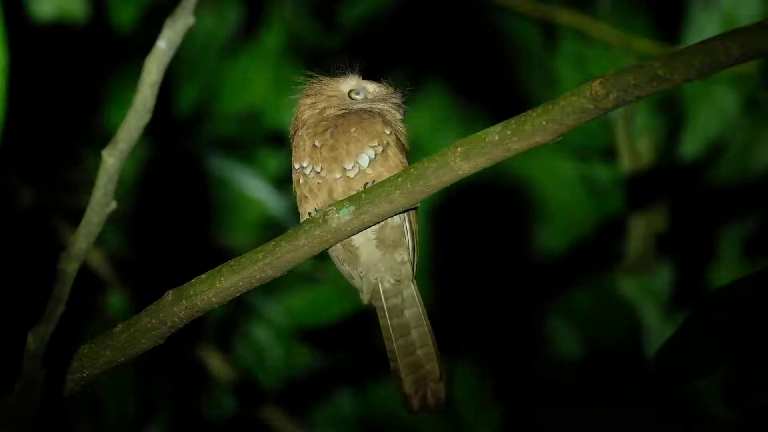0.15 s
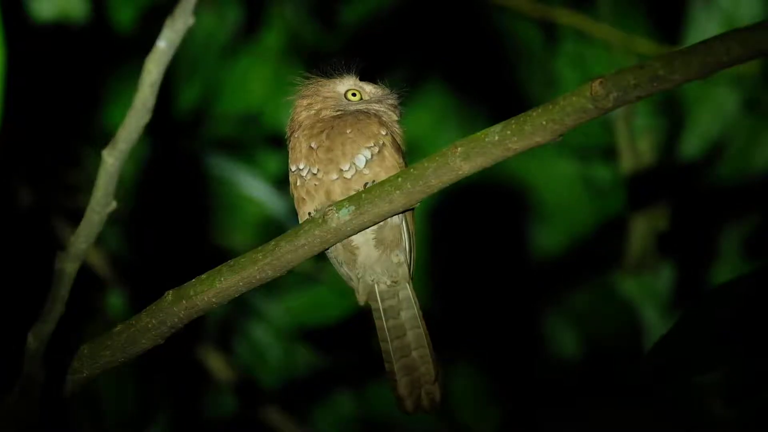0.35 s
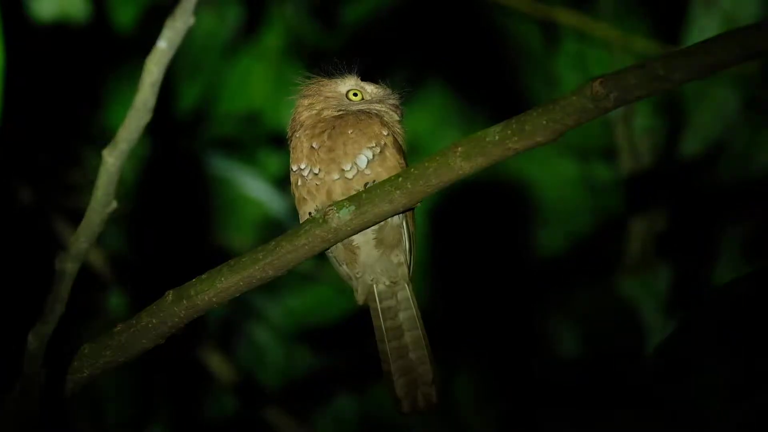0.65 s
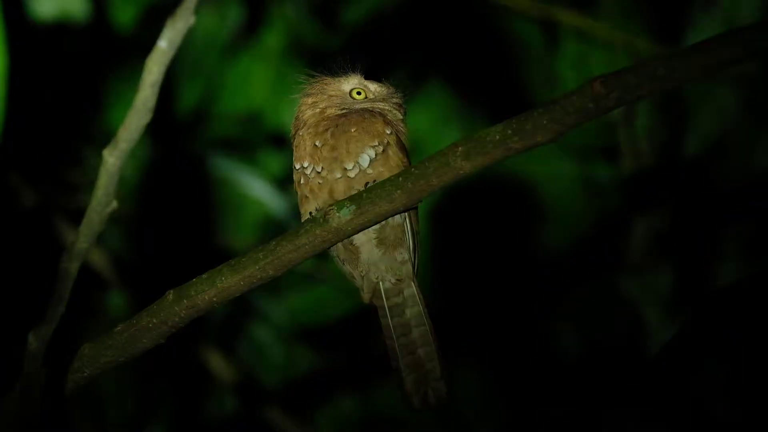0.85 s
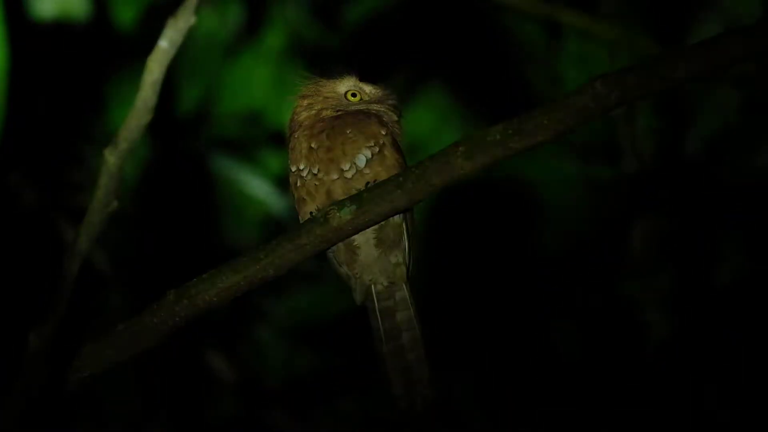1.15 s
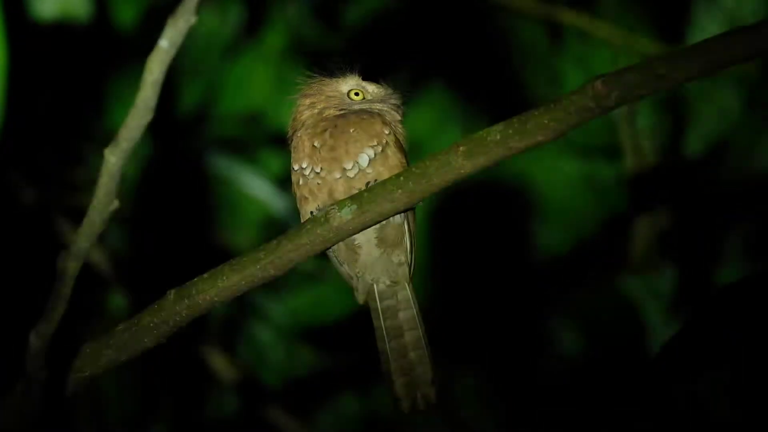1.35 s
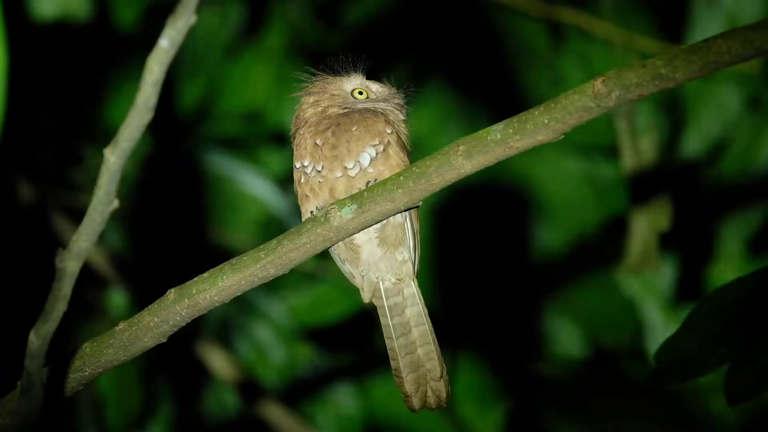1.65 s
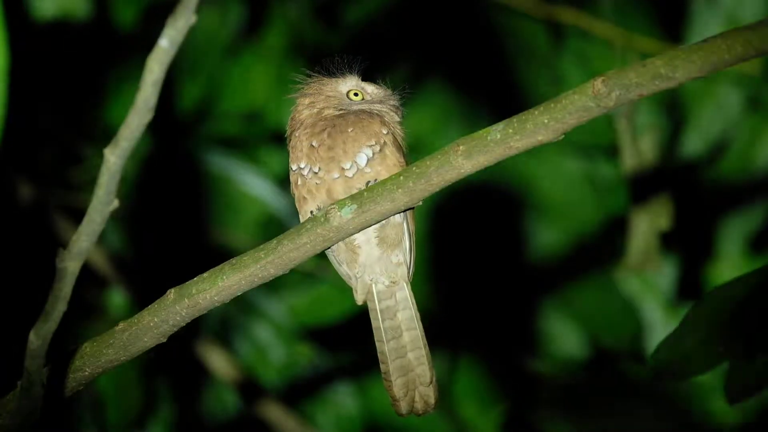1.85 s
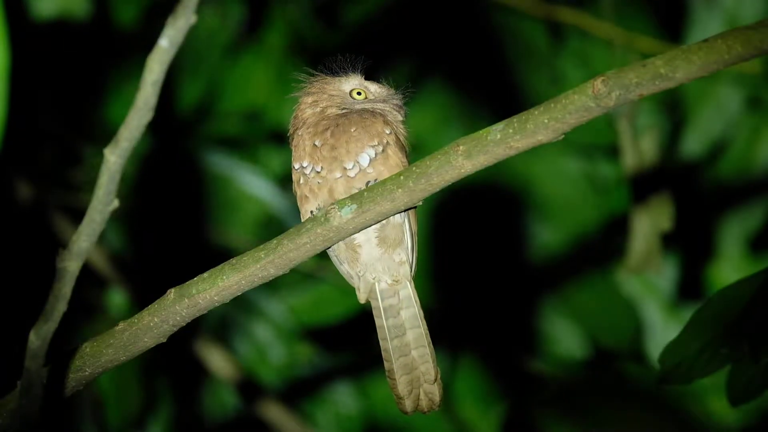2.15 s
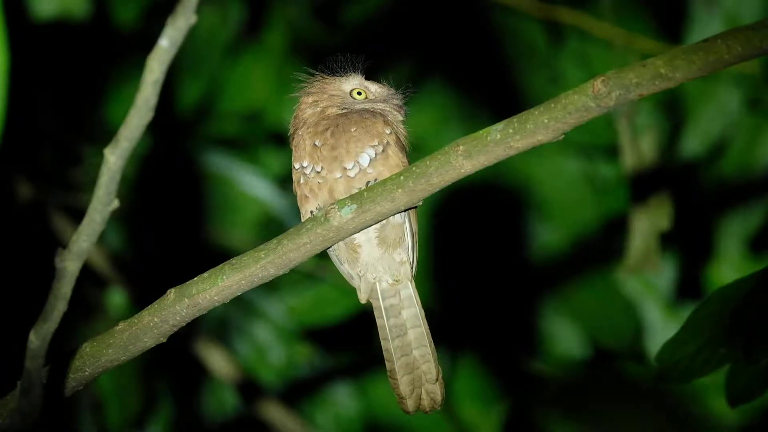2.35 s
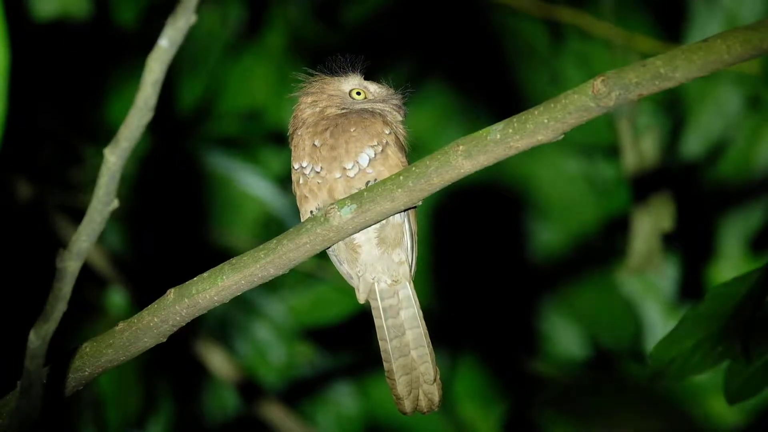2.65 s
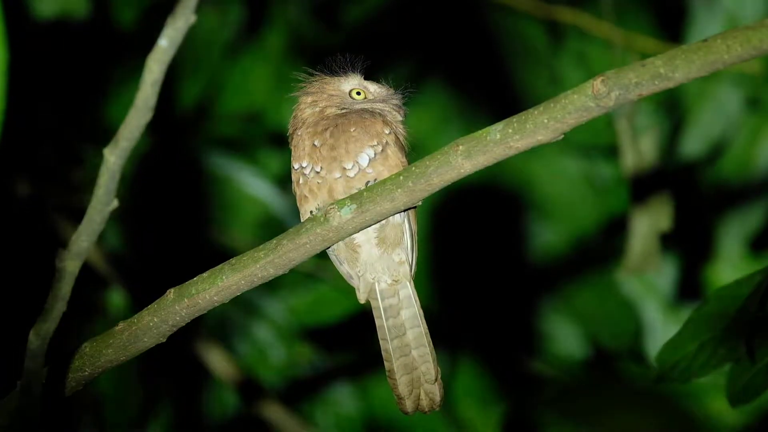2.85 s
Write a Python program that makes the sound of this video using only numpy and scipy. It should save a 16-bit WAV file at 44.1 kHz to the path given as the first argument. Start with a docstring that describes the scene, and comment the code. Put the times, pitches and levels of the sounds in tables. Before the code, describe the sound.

Night crickets singing close by, with pulsing bush-crickets, faint low rumble and early handling clicks.

```python
"""A forest at night: three kinds of cricket sing near by, over pulsing bush-crickets and a far chorus.
Each cricket song is a row of wing strokes, gliding tones scattered by trunks and leaves.
The bush-crickets add surging noise, and countless far insects merge into a hiss. A low distant rumble
of noise and tones swells and sinks underneath. The camera body clicks a few times under the hand at
the start, as short ringing modes."""
import sys
import numpy as np
from scipy import signal
from scipy.fft import rfft, irfft
from scipy.io import wavfile

SR = 44100
rng = np.random.default_rng(int(sys.argv[2]) if len(sys.argv) > 2 else 0)


def digitize_waveform(pressure):
    """Quantize a signal to 16-bit integers and store it at the path in sys.argv[1].

    Rows of a 2-D input are taken as channels; values are limited to [-1, 1].
    """
    field = np.atleast_2d(pressure).T
    bounded = np.clip(field, -1, 1)
    quanta = np.round(bounded * 32767).astype(np.int16)
    wavfile.write(sys.argv[1], SR, quanta)


N = 132741
T = np.arange(N) / SR  # time, s

# Tabled levels are relative within a song or spectrum unless noted; positive side_db is louder at left.

# low cricket's chirps: start_s, stroke_1_db, stroke_2_db, stroke_3_db, pitch_hz (of the first stroke)
CHIRPS = [(0.281, -1, 0.7, 2, 2988), (0.959, -2.5, 0, -6, 2979), (1.58, -6.5, 1, -4, 2992),
          (2.170, -8.5, 1, 0.5, 2988), (2.800, -3, 0, -14, 2992)]
CHIRP_GAP_S, CHIRP_STROKE_S, CHIRP_FALL_HZ, CHIRP_DB = 0.055, 0.066, 25.2, -46
CLOSE_S, CLOSE_DB, CLOSE_HZ = 0.19, -14, 2883  # a soft sagging note closes each chirp

# trilling cricket's two bouts: time_s, level_db, pitch_hz
TRILL_PATH = [(0.07, -13, 3720), (0.18, -3.5, 3730), (0.45, -1, 3794), (0.8, 1, 3810), (1.11, 0, 3813),
              (1.19, -18, 3830), (1.3, -58, 3780), (2.6, -51, 3540), (2.72, -13, 3550), (2.82, -7, 3660),
              (3.01, -3.5, 3765)]
TRILL_RATE_HZ, TRILL_DB, TRILL_FALL_HZ, TRILL_DROOP_HZ = 43.03, -47.5, 23, 270
RETURN_S, RETURN_DB, RETURN_FLAT_HZ = 0.0116, -3.5, 6  # the wing's softer return stroke

# high cricket's swelling phrases: loud_start_s, loud_length_s, level_db
PHRASES = [(0.102, .32, -2.5), (0.885, 0.26, 0), (1.808, .32, -2.5), (2.746, 0.29, 0.5)]
HIGH_HZ, HIGH_RATE_HZ, HIGH_DB = 6764, 27, -56
HIGH_SWELL_DB_PER_S, HIGH_FADE_DB_PER_S, HIGH_HZ_PER_DB = 194, 222.5, 4.5
HIGH_LEAD_S, HIGH_LEAD_DB = 0.14, -11.5  # each phrase starts softly, this long before its loud part

# handling clicks: start_s, peak_level_db, treble_corner_hz, side_db
CLICKS = [(0.0962, -23, 2300, -9), (0.1588, -27.5, 3320, -8), (0.2675, -27.5, 4630, -10),
          (0.4871, -26, 1210, -4.5), (0.694, -36.5, 2170, 4.5)]
# resonant modes of the camera body: pitch_hz, level_db, t60_s
BODY_MODES = [(680, -5.5, 0.051), (988, 0, .035), (1270, -2, 0.024), (1400, 2.5, 0.024), (1840, -7, 0.026),
              (2600, -1.5, 0.015), (3340, 0.5, 0.012)]

# surging bush-crickets' strokes: pitch_hz, rate_hz, fall_hz, level_db (before the surge)
SURGERS = [(4958, 48.6, 600, -61), (5384, 22, 140, -60.5)]
SURGE_S, SURGE_CREST_S, SURGE_DB = 0.2205, 0.25, 4.5
# spectrum of the bush-crickets' rasp: frequency_hz, level_db
RASP_SPECTRUM = [(4100, -39), (4500, -7.5), (4750, -4), (5050, -1.5), (5350, 1.5), (5600, -11.5),
                 (5900, -5), (6500, -65)]
# spectrum of their higher buzz: frequency_hz, level_db
BUZZ_SPECTRUM = [(5300, -19), (5700, -7.5), (5950, -7.5), (6150, 2.5), (6300, -31), (6480, -20),
                 (7000, -43)]

# far crickets that trill without pause: pitch_hz, rate_hz, fall_hz, level_db (rms), side_db
FAR_CRICKETS = [(3810, 46, 210, -58.5, 4), (3603, 51, 445, -62, 1), (2852, 52, 360, -63.5, 4),
                (6070, 64, 240, -58, 5), (6810, 27, 120, -70.5, 4)]

# spectrum of the far chorus hiss: frequency_hz, density_db_per_hz
HISS_SPECTRUM = [(2000, -13.5), (2700, -0.5), (3200, 0), (3900, -23), (4200, -22), (4800, -3), (6100, 2.5),
                 (6600, -3.5), (7300, -12), (7750, -4.5), (8200, -9), (8900, -1.5), (9900, -10),
                 (10800, -1), (11500, -11.5), (12200, -18), (12700, -25), (15000, -33)]
HISS_DB = -56

# spectrum of the distant rumble: frequency_hz, density_db_per_hz
RUMBLE_SPECTRUM = [(12, -65), (20, -29), (82, -4), (125, -6), (173, -5), (240, -4.5), (320, -6), (480, -9),
                   (564, -12.5), (612, -12.5), (1040, -22.5), (1270, -17), (1470, -27), (1590, -24),
                   (1950, -29.5), (2600, -34.5), (3380, -63), (5720, -120)]
# swelling of the rumble noise: time_s, level_db
RUMBLE_LEVEL = [(0.1, -42.2), (0.35, -42.6), (0.7, -41.4), (1.2, -41.2), (1.8, -41.8), (2.35, -41.6),
                (2.6, -39.8), (3.0, -39.2)]
# left-right likeness of the rumble noise: frequency_hz, correlation (no unit)
RUMBLE_LIKENESS = [(30, 0.94), (125, 0.87), (300, 0.81), (500, 0.6), (1000, 0.23), (2500, .2)]
# wavering tones in the rumble: pitch_hz, level_db (peak, before wavering)
DRONE = [(122, -49), (299, -53), (479, -63.5), (539, -71.5)]
# a hollow band in the rumble that swells and sinks: time_s, level_db, center_hz
HOLLOW = [(0.1, -59, 379.6), (0.6, -57.5, 420), (1.05, -45.5, 410), (1.5, -46.5, 360), (1.82, -45, 289.7),
          (2.2, -53.5, 290), (2.55, -44.5, 304.3), (3.0, -44, 295.5)]
HOLLOW_SPREAD_HZ = 83  # to either side of the center

START_S, START_DB, SETTLE_S = 0.074, -5.5, 0.055  # the recorder's opening
EDGE_HZ = 15400


def amp(db):
    """Level law: decibels to amplitude gain."""
    return 10 ** (np.asarray(db) / 20)


def evened(x):
    """Power normalization: scales to rms 1."""
    return x / np.sqrt(np.mean(x ** 2) + 1e-20)


def curve(rows):
    """Linear interpolation: each column of a time table as a signal."""
    s, *columns = np.transpose(rows)
    return [np.interp(T, s, column) for column in columns]


def read(points, hz):
    """Logarithmic frequency scale: reads a spectrum table by interpolation."""
    f, value = np.transpose(points)
    return np.interp(np.log(hz + 1), np.log(f + 1), value)


def pan(side_db):
    """Interaural level difference: left and right gains."""
    return amp([[side_db / 2], [-side_db / 2]])


def drift(rate_hz):
    """Low-passed random fluctuation: rms 1, changing up to about rate_hz."""
    s = np.arange(4096) / 1024
    lowpass = np.exp(-(np.fft.rfftfreq(len(s), s[1]) / rate_hz) ** 2)
    slow = irfft(rfft(rng.standard_normal(len(s))) * lowpass)
    slow = np.interp(T, s, slow)
    return evened(slow - slow.mean())


def noise(spectrum, likeness):
    """Partial coherence: shaped stereo noise whose ears share part of one random source."""
    hz = np.fft.rfftfreq(N, 1 / SR)
    a, b = rfft(rng.standard_normal((2, N)))
    c = np.clip(read(likeness, hz), -1, 1)
    ears = np.array([a, c * a + np.sqrt(1 - c ** 2) * b])
    return evened(irfft(ears * amp(read(spectrum, hz)), N))


def forest(x, near_db, far_db, near_t60=0.16, far_t60=1.25):
    """Multiple scattering: direct sound, near leaves and trunks, and a long thin tail; rms 1 per ear."""
    t = T[:SR // 2]
    at = rng.integers(100, len(t), (2, 800))  # echo delays, samples
    near = amp(near_db - 60 * t[at] / near_t60) / np.sqrt(near_t60)
    far = amp(far_db - 60 * t[at] / far_t60) / np.sqrt(far_t60)
    echoes = rng.choice([-1, 1], at.shape) * (near + far) * np.sqrt(np.log(1000) / at.shape[1])
    taps = np.zeros((2, len(t)))
    np.put_along_axis(taps, at, echoes, 1)
    taps[0, 0] = taps[1, 3] = 1  # direct sound, three samples later at right
    scattered = signal.fftconvolve(x[None], taps, axes=1)[:, :N]
    return np.array([evened(ear) for ear in scattered])


def stroke(t, length_s, hz, fall_hz, droop_hz=0, peak=0.99):
    """Stridulation: one wing stroke's tone swells, slides down, and droops as the wing slows."""
    out, on = np.zeros(N), (t > 0) & (t < length_s)
    u = t[on] / length_s
    slide = fall_hz * (u - u * u) / 2
    droop = droop_hz * u ** 5 / 5
    turns = length_s * (np.broadcast_to(hz, N)[on] * u + slide - droop)
    out[on] = np.sin(np.pi * u ** peak) * np.sin(2 * np.pi * turns)  # peak below 1: crest comes early
    return out


def low_cricket():
    """Pulse grouping: chirps of three long strokes near 3 kHz run together, then a soft closing note."""
    song = np.zeros(N)
    for start, *levels, hz in CHIRPS:
        for k, db in enumerate(levels):
            late, sharp = rng.standard_normal(2)
            t = T - start - k * CHIRP_GAP_S - 0.0026 * late
            stroke_hz = hz - 7 * k + 6 * sharp
            song += amp(db) * stroke(t, CHIRP_STROKE_S, stroke_hz, CHIRP_FALL_HZ, droop_hz=71, peak=0.85)
        song += amp(CLOSE_DB) * stroke(T - start - CLOSE_S, 0.062, CLOSE_HZ, 135, droop_hz=150)
    song = song * amp(2.8 * drift(130))
    return amp(CHIRP_DB) * pan(3.1) * forest(song, near_db=-5, far_db=-11, near_t60=0.11)


def trilling_cricket():
    """Periodic pulsing: very regular strokes and return strokes climb in pitch as each bout gets going."""
    db, hz = curve(TRILL_PATH)
    t = T + 0.00002 * drift(11.6)
    period = 1 / TRILL_RATE_HZ
    out = stroke(t % period, 0.012, hz, TRILL_FALL_HZ, TRILL_DROOP_HZ, peak=1.0)
    back = stroke((t - RETURN_S) % period, 0.011, hz - RETURN_FLAT_HZ,
                  TRILL_FALL_HZ, TRILL_DROOP_HZ, peak=0.8)
    song = amp(db) * (out + amp(RETURN_DB) * back)
    return amp(TRILL_DB) * pan(0.022) * forest(song, near_db=-2, far_db=-16, near_t60=0.11)


def high_cricket():
    """Amplitude modulation: a thin shimmering trill starts softly, swells, holds and fades, flatter when soft."""
    def phrase(s, length):
        swell = HIGH_SWELL_DB_PER_S * np.maximum(s - T, 0)
        fade = HIGH_FADE_DB_PER_S * np.maximum(T - s - length, 0)
        return -swell - fade

    levels = []
    for s, length, level in PHRASES:
        lead = HIGH_LEAD_DB + phrase(s - HIGH_LEAD_S, length)
        levels.append(level + np.maximum(phrase(s, length), lead))
    db = np.max(levels, axis=0)
    cycle = (HIGH_RATE_HZ * T + 0.31 * drift(16.2)) % 1
    # pitch follows loudness, falls through each stroke, and jitters
    hz = HIGH_HZ + HIGH_HZ_PER_DB * np.maximum(db, -25) - 40 * (cycle - 0.5) + 18 * drift(130)
    pulses = np.sin(np.pi * cycle) ** 0.34
    song = amp(db + 2.8 * drift(190)) * pulses * np.sin(2 * np.pi * np.cumsum(hz) / SR)
    return amp(HIGH_DB) * pan(11.2) * forest(song, near_db=-8, far_db=-4)


def handling():
    """Impulse excitation: sharp ticks ring the damped modes of the camera body briefly."""
    out = np.zeros((2, N))
    t = T[:SR // 10]
    for s, db, corner_hz, side_db in CLICKS:
        ring = 0
        for hz, level, t60 in BODY_MODES:
            mode_hz = hz * rng.uniform(0.947, 1.04)
            ring = ring + amp(level - 60 * t / t60) * np.sin(2 * np.pi * mode_hz * t)
        tick = 5 * rng.standard_normal(len(t)) * np.exp(-t / 0.00044)
        lowpass = signal.butter(3, corner_hz, fs=SR, output="sos")
        click = signal.sosfilt(lowpass, ring / 2 + tick)
        out[:, round(s * SR):][:, :len(t)] += amp(db) * pan(side_db) * click / abs(click).max()
    return out


def rasp(spectrum, period_s, crest_s, depth_db, rate_hz, grain_db):
    """Modulated noise: quick scrapes of a toothed file, in slow even surges."""
    surge = depth_db * np.cos(2 * np.pi * (T - crest_s) / period_s)
    scrapes = []
    for _ in range(2):  # one grain for each ear
        cycles = rate_hz * T + rng.random() + 0.18 * drift(45)
        scrapes.append(np.cos(2 * np.pi * cycles) + 0.5 * drift(130))
    hiss = noise(spectrum, [(1000, 0.092), (9000, 0.033)])
    return evened(hiss * amp(surge + grain_db * np.array(scrapes)))


def bush_crickets():
    """Periodic surging: falling scrapes and a rasp surge at one pace, and a higher buzz more slowly."""
    # the falling scrapes crest 35 ms ahead of the rasp
    surge = amp(SURGE_DB * np.cos(2 * np.pi * (T - SURGE_CREST_S + 0.035) / SURGE_S))
    out = 0
    for hz, rate, fall_hz, db in SURGERS:
        t = (T + rng.random() + 0.00004 * drift(16)) % (1 / rate)
        song = surge * stroke(t, 0.37 / rate, hz, fall_hz)
        out = out + amp(db) * forest(song, near_db=10, far_db=5)
    low = rasp(RASP_SPECTRUM, period_s=SURGE_S, crest_s=SURGE_CREST_S, depth_db=4.0, rate_hz=33, grain_db=2.5)
    high = rasp(BUZZ_SPECTRUM, period_s=0.418, crest_s=0.22, depth_db=2.5, rate_hz=99, grain_db=4.5)
    return pan(4.4) * (out + amp(-56.5) * low) + amp(-55.5) * pan(0.9) * high


def far_crickets():
    """Reverberant distance: steady trills from deep among the trees, mostly echo."""
    out = 0
    for hz, rate, fall_hz, db, side_db in FAR_CRICKETS:
        t = (T + rng.random() + 0.000593 * drift(9.77)) % (1 / rate)
        song = amp(2.1 * drift(1.3)) * stroke(t, 0.73 / rate, hz, fall_hz)
        out = out + amp(db) * pan(side_db) * forest(song, near_db=2.5, far_db=5.5)
    return out


def chorus():
    """Incoherent summation: countless far insects merge to a hiss, given as shaped noise."""
    level = amp(HISS_DB + 0.5 * drift(6.8) + 0.7 * drift(120))
    return level * pan(0.99) * noise(HISS_SPECTRUM, [(2000, 0.12), (12000, 0.033)])


def rumble():
    """Narrow bands within broadband noise: low distant rumble, a moving hollow band, wavering tones."""
    drone = 0
    for hz, db in DRONE:
        turns = np.cumsum(hz + 4 * drift(9.2)) / SR
        drone = drone + amp(db + 3.3 * drift(3.1)) * np.sin(2 * np.pi * turns)
    db, hz = curve(HOLLOW)
    carrier = np.exp(2j * np.pi * np.cumsum(hz) / SR)

    def band():
        slow = drift(HOLLOW_SPREAD_HZ) + 1j * drift(HOLLOW_SPREAD_HZ)
        return (slow * carrier).real

    both, left, right = band(), band(), band()
    hollow = amp(db) * evened(both + 0.26 * np.array([left, right]))
    low_noise = amp(curve(RUMBLE_LEVEL)[0]) * noise(RUMBLE_SPECTRUM, RUMBLE_LIKENESS)
    return pan(0.58) * (low_noise + hollow + drone)


def scene():
    """Superposition: all the insects, the camera and the rumble add."""
    near = low_cricket() + trilling_cricket() + high_cricket() + handling()
    return near + bush_crickets() + far_crickets() + chorus() + rumble()


def record(dry):
    """Exponential settling and band limiting: the recorder opens from silence, settles, and cuts the top."""
    settling = amp(START_DB * np.exp(-np.maximum(T - START_S, 0) / SETTLE_S))
    opening = (T > START_S) * settling
    lowpass = signal.cheby1(14, 0.05, EDGE_HZ, fs=SR, output="sos")
    return signal.sosfilt(lowpass, dry * opening)


dry = scene()
out = record(dry)
digitize_waveform(out)
```